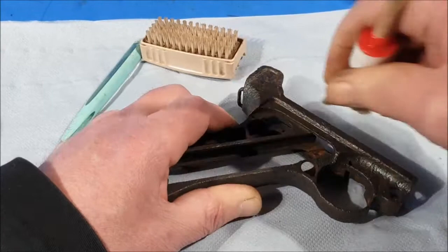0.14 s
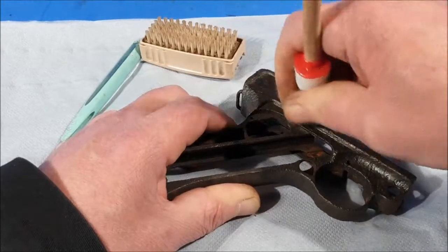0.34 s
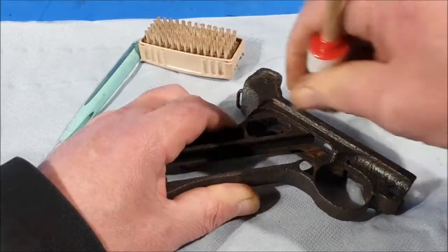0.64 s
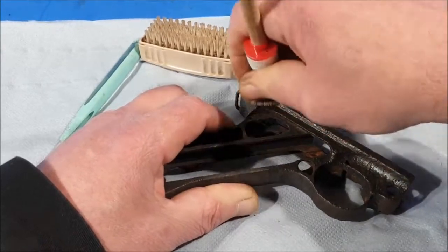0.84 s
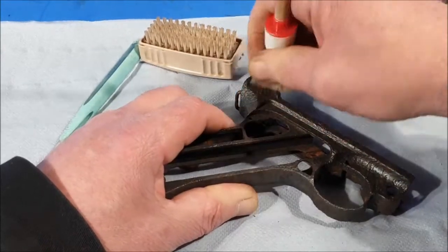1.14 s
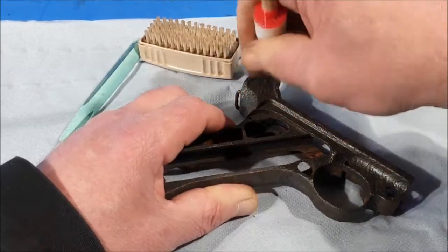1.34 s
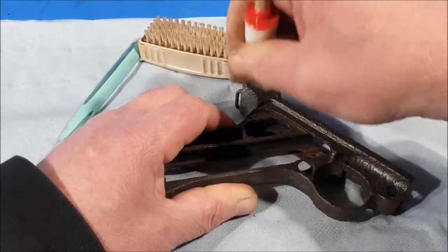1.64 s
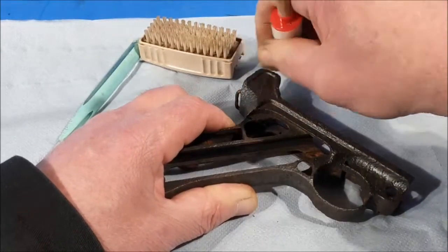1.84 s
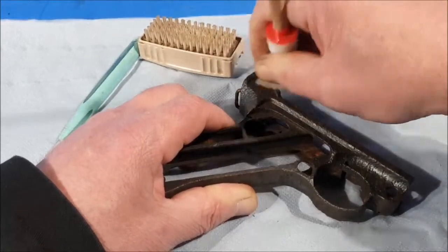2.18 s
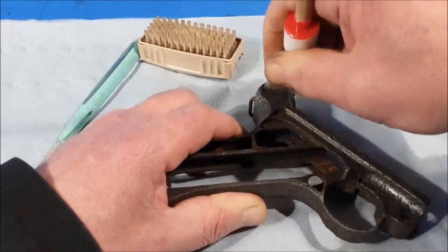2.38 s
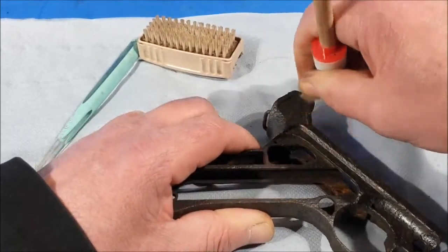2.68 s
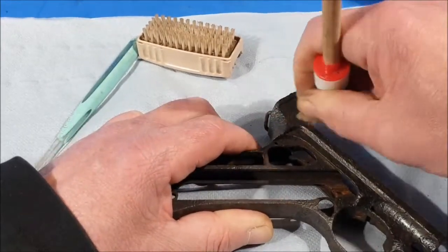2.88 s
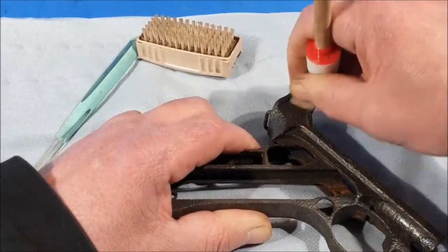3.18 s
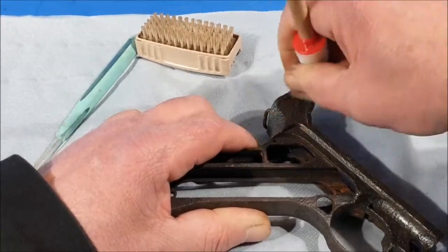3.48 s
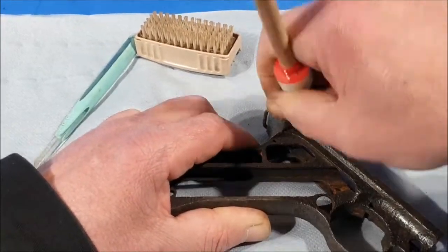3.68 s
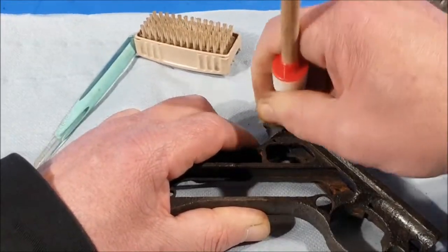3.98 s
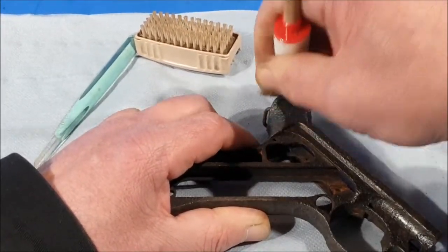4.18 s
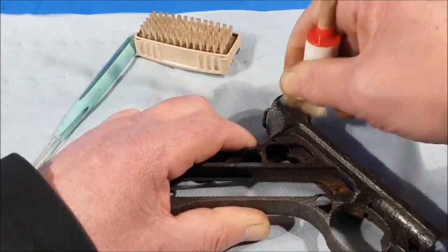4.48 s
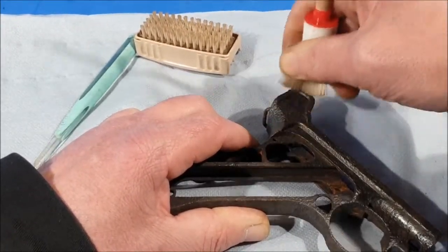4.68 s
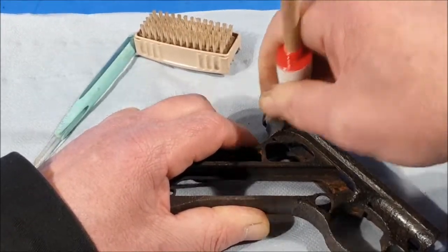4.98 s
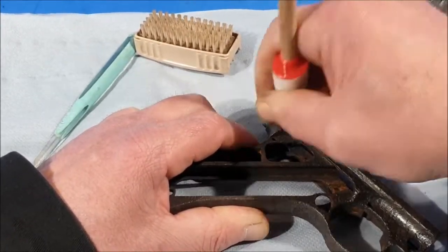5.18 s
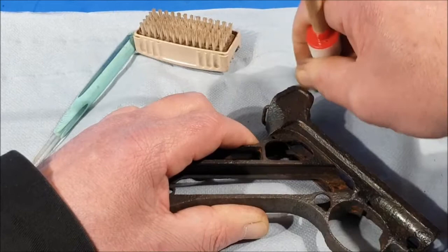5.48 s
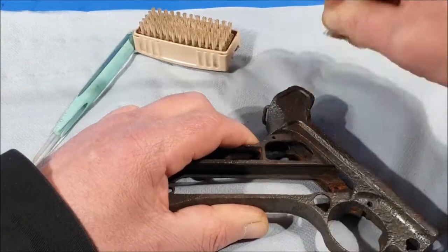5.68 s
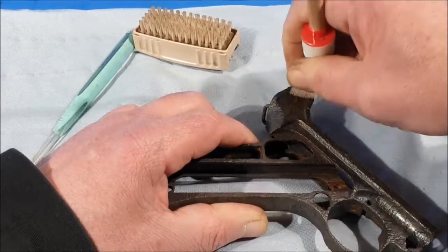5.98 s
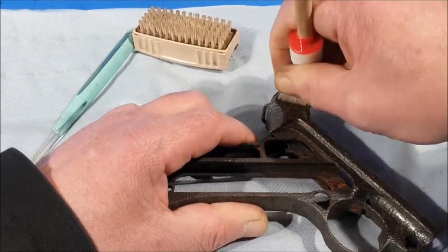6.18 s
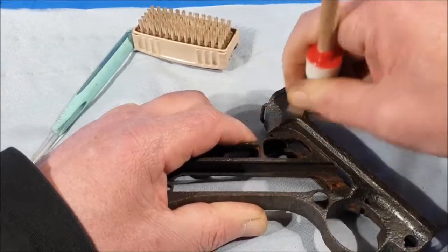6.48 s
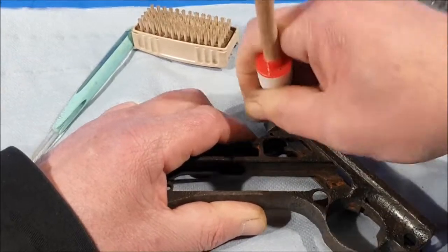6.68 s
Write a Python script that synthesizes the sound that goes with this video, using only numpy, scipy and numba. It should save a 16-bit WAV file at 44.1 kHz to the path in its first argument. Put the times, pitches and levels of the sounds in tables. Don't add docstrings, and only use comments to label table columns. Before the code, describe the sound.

A stiff brush scrapes a rusty steel frame in short, dry, gritty strokes, with dull bench thumps and faint metallic ticks in a quiet room.

```python
import sys
import numpy as np
from scipy import signal
from scipy.fft import rfft, irfft, next_fast_len
from scipy.io import wavfile
from scipy.ndimage import uniform_filter1d
from numba import njit

SR = 44100
rng = np.random.default_rng(int(sys.argv[2]) if len(sys.argv) > 2 else 0)


def put_to_file(sound):
    columns = np.atleast_2d(sound).T
    safe = np.clip(columns, -1, 1)
    whole_steps = np.round(safe * 32767)
    wavfile.write(sys.argv[1], SR, whole_steps.astype(np.int16))


def invert_db(x):
    u = np.asarray(x, float) / 20
    return 10 ** u


N = 301203

# (time [s], bench thump [dB], scuff of the tips [dB], push [ms], lowest bench modes [dB])
LANDINGS = [(0.296, -54, -52.5, 5.3, -2), (0.775, -27.5, -48, 2.2, 2), (1.151, -25.5, -46, 3.6, -1),
            (1.408, -21.5, -49, 3.8, -1.5), (1.704, -20, -45, 3.93, 1), (1.938, -19, -51.5, 5.7, -6),
            (2.175, -19.5, -46, 3, 0), (2.865, -34, -50, 5.8, 3), (3.158, -16, -42, 6.5, -2),
            (3.433, -21, -43, 4.5, 1.5), (3.712, -22.5, -42, 3.8, 0.5), (3.99, -27, -47.5, 4.9, 2.5),
            (4.24, -19, -42, 4.2, 0.5), (4.493, -25, -46, 6.5, -2.5), (4.752, -23, -42, 3.86, -2),
            (4.929, -29, -45.5, 14.5, -1), (5.891, -26.5, -42.5, 6.6, 0.5), (6.686, -22, -42, 5.1, 3.5)]
# (pitch [Hz], level [dB], time to fade by 60 dB [s])
LOW_RING = [
    (3730, -14, .05),
    (4730, -7, .04),
    (4813, 0, .105),
    (4870, -9, .045),
    (5819, -10, .05),
]
MID_RING = [
    (7540, -8, .03),
    (7634, -1, .06),
    (7700, -12, .03),
    (8570, -14, .04),
    (10400, -10, .05),
    (11240, -10, .06),
]
HIGH_RING = [
    (14040, -2, .04),
    (14610, -8, .04),
]


def level(x, db):
    return x * invert_db(db) / np.sqrt(np.mean(x ** 2))


def colour(x, points, scale=1):
    hz, db = np.transpose(points)
    size = next_fast_len(N)
    f = np.arange(1, size // 2 + 2) * SR / size
    gain = invert_db(scale * np.interp(np.log(f), np.log(hz), db))
    return irfft(rfft(x, size) * gain, size)[..., :N]


def band_pass(x, hz, kind):
    return signal.sosfilt(signal.butter(3, hz, kind, fs=SR, output="sos"), x)


def ring(x, modes):
    out = 0
    for hz, db, t60, *sign in modes:
        r = np.exp(-np.log(1000) / (abs(t60) * SR))
        w = 2 * np.pi * hz / SR
        tone = signal.lfilter([0, r * np.sin(w)], [1, -2 * r * np.cos(w), r * r], x)
        out = out + np.prod(sign) * invert_db(db) * tone
    return out


def blows(times, db, shape):
    out = np.zeros(N + 4096)
    for k, (s, gain) in enumerate(zip(times, invert_db(db))):
        piece = shape(k)
        out[int(s * SR):int(s * SR) + len(piece)] += gain * piece
    return out[:N]


def walk(rate):
    k = int(SR / rate)
    steps = np.repeat(rng.standard_normal(N // k + 1), k)
    return 1.33 * uniform_filter1d(steps, k)[:N]


def curve(rows):
    s, *columns = np.transpose(rows)
    return [np.interp(np.arange(N) / SR, s, c) for c in columns]


def contact(rows):
    rise_db_s, fall_db_s = 875, 1030
    s, length, first_db, last_db, tint_db = np.transpose(rows)[:, :, None]
    t = np.arange(N // 44 + 2) / 1000
    lean = np.clip((t - s) / np.maximum(length, .002), 0, 1)
    db = first_db + (last_db - first_db) * lean
    db = db - rise_db_s * np.maximum(s - t, 0) - fall_db_s * np.maximum(t - s - length, 0)
    gain = invert_db(np.maximum(db, -130))
    total = gain.sum(axis=0)
    return curve(np.c_[t, total, (gain * tint_db).sum(axis=0) / total])


@njit
def walls(x, lags, gain, damp):
    line, soft, out = np.zeros((8, 4096)), np.zeros(8), np.zeros((2, len(x)))
    for i in range(len(x)):
        total = 0.
        for k in range(8):
            soft[k] += (1 - damp) * (gain[k] * line[k, (i - lags[k]) & 4095] - soft[k])
            total += soft[k]
            out[k % 2, i] += soft[k]
        for k in range(8):
            line[k, i & 4095] = x[i] + soft[k] - total / 4
    return out


def room(x):
    t60_s, damp, tail_db = 0.27, 0.44, -14
    lags = rng.integers(400, 1900, 8)
    return invert_db(tail_db) * walls(x, lags, invert_db(-60 * lags / SR / t60_s), damp)


def air():
    # (pitch [Hz], level [dB per Hz])
    air_colour = [(18, -63), (30, 5.5), (107, 0.5), (340, -12.5), (814, -13), (1150, -33), (3660, -40),
                  (6720, -44), (8310, -41), (14800, -34), (16500, -62)]
    mid, side = rng.standard_normal((2, N))
    side = colour(side, [(40, 10.5), (100, -11.5), (500, -2.5), (1200, 5.0)])
    return level(colour(np.array([mid + side, mid - side]), air_colour), -57) * invert_db(walk(3.6))


def hollow():
    # (start [s], length [s], first level [dB], last level [dB])
    whispers = [(.2, 0.31, -87, -64), (2.55, 0.26, -79, -78), (3.0, .15, -80, -85), (3.29, .14, -76, -80),
                (3.58, .12, -74, -84), (3.84, 0.15, -89, -90), (4.27, 0.13, -70, -78),
                (4.86, 0.24, -78, -86), (5.67, .22, -70, -74), (5.92, 0.12, -71, -68),
                (6.24, 0.052, -71, -76), (6.58, .1, -74, -91)]
    # (pitch [Hz], level [dB], time to fade by 60 dB [s])
    cavity = [
        (2220, -2, .035),
        (2290, 0, .035),
        (2370, -7, .03),
    ]
    noise = ring(rng.standard_normal((2, N)), cavity)
    gain = contact(np.c_[whispers, np.zeros(len(whispers))])[0] * invert_db(1.2 * walk(25))
    return level(noise, 0) * uniform_filter1d(gain, size=700)


def sleeve():
    # (start [s], length [s], first level [dB], last level [dB])
    passes = [
        (0.0, 0.034, -59, -66),
        (.44, 0.054, -64, -62),
        (.5, 0.15, -60, -77),
        (1.8, 0.11, -66.5, -68.5),
        (4.76, 0.2, -57.5, -71),
        (2.32, 0.116, -63, -64),
        (2.46, 0.13, -58, -67),
        (4.95, 0.25, -63.5, -63.5),
    ]
    noise = colour(rng.standard_normal((2, N)), [(900, -2), (1250, -0.5), (1650, -1.0), (2200, -12.0)])
    gain = contact(np.c_[passes, np.zeros(len(passes))])[0]
    return level(noise, 0.38) * gain * invert_db(2.9 * walk(29.99))


def cloth():
    # (start [s], length [s], first level [dB], last level [dB], dull swish [dB])
    slides = [(0.047, 0.11, -61.5, -58, -12), (0.157, 0.21, -57, -73, -32), (0.625, 0.13, -96, -71, -10),
              (2.301, 0.19, -53, -81, -4), (2.4, 0.058, -70, -67, -20), (2.47, 0.14, -51.5, -52.5, -13.5),
              (2.751, 0.11, -59, -70, -6), (3.027, 0.18, -63, -76, -24), (3.317, 0.11, -61.5, -66.5, -20),
              (3.59, 0.15, -59, -76, -5.5), (5.669, 0.084, -51, -63.5, -8), (5.765, 0.16, -61, -55, -10.5),
              (5.953, 0.17, -54.5, -64, -12)]
    gain, dull_db = contact(slides)
    rustle = colour(rng.standard_normal((2, N)), [(1200, -11), (1900, -14), (2150, -2.5), (3000, -6.5),
                                                  (4000, -3.0), (6000, -5.5), (11000, -1.0), (16000, -7.0)])
    swish = colour(rng.standard_normal((2, N)), [(700, -1.0), (1200, 0.0), (1700, -43), (3500, -7), (8000, -36)])
    fabric = level(rustle, -2) + level(swish, -2) * invert_db(dull_db)
    return fabric * uniform_filter1d(gain * invert_db(1.5 * walk(40)), 500)


def bench(stroke_db):
    # (time [s], bench thump [dB], push [ms], lowest bench modes
    # [dB])
    bumps = [(0.33, -37, 5.2, -0.5), (2.474, -43.5, 1.7, 3.5), (2.56, -46, 5.3, 1), (1.745, -33, 3.4, -9),
             (1.5, -35, 5, 0), (6.01, -36, 4.1, 1), (5.135, -38, 1.7, 12.5), (5.327, -39.5, 6.2, 8.5),
             (5.512, -30, 9.6, 1.5), (5.626, -27.5, 4.8, -16), (5.634, -35.5, 3.5, 9.5),
             (5.3, -27.5, 5.3, -8), (6.382, -24, 7.4, -3.5), (6.795, -44, 2.7, -16)]
    # (time [s], level [dB])
    press = [(0.0, -55), (0.61, -69), (1.23, -57.5), (1.33, -55.5), (2.17, -57.5), (2.32, -49.5),
             (2.63, -65), (3.58, -52), (3.67, -48.5), (4.34, -62), (4.43, -56), (4.55, -60.5),
             (5.55, -56.5), (5.73, -52), (5.93, -49.5), (6.09, -58.5), (6.72, -59.5), (6.83, -55.5)]
    # (time [s], upper bench modes [dB])
    bearing = [(.3, 0), (.78, -0.5), (1.15, 1), (1.41, -0.5), (1.7, 5.5), (1.94, -2), (2.18, 0.5),
               (2.87, 1), (3.16, 1.5), (3.43, 3), (3.71, 0.5), (3.99, -3), (4.24, 0.5), (4.49, 2),
               (4.75, 0.5), (5.3, -1), (5.89, 3), (6.69, -0.5)]
    # (pitch [Hz], level [dB], time to fade by 60 dB [s], signed weight)
    bench_modes = [
        (49.6, -2.5, 0.61, 0.44),
        (87.4, 8, 0.069, 1),
        (134.9, -3, 0.39, 0.65),
        (171, -1.5, 0.17, -0.69),
        (217.5, -7.5, 0.41, -0.81),
        (275, -6.5, 0.053, -1.67),
        (397, -18.5, 0.22, 1),
        (309.5, -17.5, 0.15, 0.73),
    ]
    landings = np.array(LANDINGS)[:, [0, 1, 3, 4]]
    s, thump_db, push_ms, deep_db = np.vstack([landings, bumps]).T
    width = np.clip(push_ms * SR / 1000, 40, 900).astype(int)
    spot_db = 1.1 * rng.standard_normal((len(bench_modes), len(s)))
    upper_db = np.interp(s, *np.transpose(bearing))

    def push(k):
        return np.r_[-.3 * np.hanning(130) / 65, np.hanning(width[k]) / width[k] * 2]

    thumps = 0
    for db, mode in zip(spot_db, bench_modes):
        blow_db = thump_db - 7.5 + db + deep_db * (mode[0] < 110) + upper_db * (mode[0] > 190)
        thumps = thumps + ring(blows(s, blow_db, push), [mode])
    thumps = thumps * invert_db(1.1 * walk(30))
    shake = uniform_filter1d(rng.standard_normal((2, N)), 60) * invert_db(3 * walk(25))
    shake_db = curve(press)[0] + 4 + 0.41 * np.maximum(stroke_db + 61.5, -25)
    shake = ring(shake * invert_db(shake_db) / shake.std(), bench_modes) * invert_db(-47.5)
    uneven = 0.22 * shake[1] + 0.23 * uniform_filter1d(shake[1], size=400)
    return thumps + shake[0] + uneven * np.array([[1], [-1]])


def struck(s, db, modes):
    n = np.arange(int(.004 * SR))
    out = 0
    for mode in modes:
        swell = np.hanning(len(n)) * np.cos(2 * np.pi * mode[0] * n / SR) * 4 / len(n)
        out = out + ring(blows(s, db, lambda k: swell), [mode])
    return out


def clinks():
    # (time [s], blow [dB], low ring [dB], middle ring [dB], high ring [dB])
    touches = [(3.272, -55, -54, -65, -62), (4.535, -55, -46, -58, -60), (1.245, -60, -47, -50, -60),
               (2.262, -57, -53, -58, -60), (5.52, -57, -41, -60, -58), (1.188, -70, -47, -43, -58),
               (1.153, -56, -56, -47.5, -60), (1.284, -45, -50, -52, -38), (1.408, -43, -57, -45, -62),
               (1.435, -50, -67, -52, -62), (2.72, -53, -50, -56, -58), (3.714, -50, -54, -49, -60),
               (5.583, -43, -44, -52, -46), (4.241, -16.5, -54, -55, -63), (5.893, -25, -53, -52, -55),
               (6.394, -40, -38, -57, -55), (6.49, -47, -43, -53, -55), (6.688, -45, -51, -61, -57),
               (1.505, -31, -62, -40, -44), (3.163, -36, -49, -50, -62), (3.546, -45, -47, -48, -55),
               (6.01, -36, -53, -63, -52), (6.57, -47, -51, -58, -59), (1.6091, -34, -66, -46, -52),
               (1.785, -30, -60, -43.5, -52), (2.034, -21, -70, -43, -54), (2.96, -36, -41.5, -61, -52),
               (3.25, -32, -45, -37, -52), (3.497, -30, -45, -58, -50), (3.7774, -30, -37, -57, -51),
               (3.8063, -26, -53, -62, -45), (3.864, -45, -71, -56, -67), (3.872, -52, -55, -75, -54),
               (4.4967, -60, -46, -45, -59), (4.7545, -10, -36.5, -35, -54), (4.9319, -22, -54, -43, -58),
               (5.6272, -6, -36.5, -28, -27), (5.6402, -3, -45, -34, -34), (6.3794, -40, -50, -47, -53),
               (6.455, -43, -35, -41, -32)]
    # (pitch [Hz], level [dB], time to fade by 60 dB [s])
    handle = [
        (365, -12, 0.19),
        (507, 9, 0.0096),
        (765, 10.5, 0.0045),
        (1050, 0, 0.022),
    ]
    s, crack_db, *rings_db = np.transpose(touches)
    noise = rng.standard_normal((len(s), 200)) * np.exp(-np.arange(200) / SR / 0.0004)
    crack = blows(s, crack_db - 23, lambda k: noise[k])
    knock = ring(blows(s, crack_db - 38, lambda k: np.ones(1)), handle)
    grip = invert_db(1.2 * walk(70))
    steel = sum(struck(s, db + 0.5, modes) for db, modes in zip(rings_db, (LOW_RING, MID_RING, HIGH_RING)))
    return crack + knock + grip * steel


def flecks(db):
    t60_s, snaps_per_s = 0.0073, 130
    out = 0
    for hz in np.geomspace(2280, 9360, num=12):
        snaps = (rng.random((2, N)) < snaps_per_s / SR) * rng.standard_normal(N)
        out = out + level(ring(snaps, [(hz, 0, t60_s)]), -11 - 6 * (hz < 3600))
    return out * invert_db(db - 12)


def ticks():
    # (time [s], peak [dB], centre [Hz], width [octaves])
    flicks = [(0.323, -36, 6950, 2.9), (.575, -39, 7000, 2), (0.706, -41, 6000, 1.3), (.73, -41, 6500, 1),
              (.771, -31.5, 8050, 2.2), (1.887, -49, 7000, 2.2), (2.473, -46, 4000, 1.5),
              (2.902, -31, 6000, 3), (3.609, -46, 2470, 1.5), (3.967, -51, 2500, 1.2),
              (4.014, -39, 12000, 1.2), (4.026, -45, 8000, 2.2), (4.188, -48, 2500, 1.8),
              (4.4806, -26, 11500, 0.79), (4.687, -34, 12000, 1.1), (4.709, -34, 1100, 0.91),
              (5.5838, -32, 5000, 1.1), (5.5943, -29, 3000, 3.6), (5.6265, -11, 7000, 2.3),
              (5.6287, -10, 9000, 2.2), (5.6395, -17.5, 6000, 4.1), (5.5965, -17, 800, 1.5),
              (1.604, -35, 8000, 2), (1.614, -38, 7000, 3), (5.9523, -32, 9000, 2),
              (6.7057, -18, 7050, 2.42), (6.7275, -32, 7000, 2.5), (6.796, -17, 13100, .7)]
    strikes = [(s, scuff_db - 5, 6500, 2.6) for s, _, scuff_db, _, _ in LANDINGS]
    s, tick_db, hz, octaves = np.vstack([strikes, flicks]).T
    crackle_s = np.where(np.arange(len(s)) < len(strikes), .0022, .001)
    fade = np.exp(-np.arange(900) / SR / crackle_s[:, None, None])
    noise = rng.standard_normal((len(s), 2, 900)) * fade
    edges = hz[:, None] * 2 ** (np.maximum(octaves, .2)[:, None] * [-.5, .5])
    edges = np.minimum(edges, [16000, 20000])
    noise = [band_pass(n, e, "band") for e, n in zip(edges, noise)]
    return np.array([blows(s + 0.00076, tick_db - 9.0, lambda k: noise[k][side]) for side in range(2)])


def stroke():
    # (start [s], length [s], first level [dB], last level [dB], fine hiss [dB])
    drags = [(0.0, 0.027, -47, -66, -6.5), (.355, 0.031, -57, -51, -4), (0.4, 0.074, -47.5, -40.5, -3),
             (0.487, 0.091, -44.5, -58, -1.5), (0.8, 0.071, -68, -52, -4),
             (0.885, 0.07, -48.5, -35.5, -4.5), (1.183, 0.097, -53, -38.5, -6),
             (1.452, 0.053, -45, -32.5, -5), (1.6, 0.008, -84, -51, 7), (1.738, 0.039, -45, -30.5, -6.5),
             (1.968, 0.042, -56, -39, -2), (2.012, 0.015, -42, -31, -4), (2.2, 0.01, -51.5, -41, -2),
             (2.228, 0.043, -37.5, -44.5, -4.5), (2.629, 0.091, -49, -43.5, -2),
             (2.919, 0.048, -40, -40, -3), (3.183, 0.069, -47.5, -33, -5.5),
             (3.471, 0.074, -45, -40.5, -0.5), (3.735, 0.065, -52, -32.5, -3.5),
             (3.872, 0.032, -62, -76, -8), (4.0, 0.043, -66, -57, -4), (4.06, 0.052, -52.5, -46.5, 0),
             (4.304, 0.08, -46, -42.5, -5), (4.531, 0.12, -40.5, -47.5, -4),
             (4.791, 0.04, -35.5, -52, -5.5), (4.834, 0.058, -48.5, -54, -8),
             (6.707, 0.058, -57, -60, -2.5), (6.793, 0.039, -50.5, -38.5, -3)]
    # (start [s], length [s], first level [dB], last level [dB], fine hiss [dB])
    scrubs = [(4.942, 0.022, -53, -60, -9), (5.382, 0.025, -65, -62, -1), (5.468, 0.023, -61, -66, -9),
              (5.002, 0.064, -47.5, -47.5, -1.5), (5.126, 0.041, -43.5, -38.5, -7),
              (5.215, 0.046, -39.5, -43.5, -6.5), (5.308, 0.029, -50.5, -39, -5.5),
              (5.404, 0.042, -43.5, -45.5, -4), (5.504, 0.053, -46.0, -40, 1),
              (5.597, 0.042, -39, -74, -13.5), (5.645, 0.024, -35.5, -59, -12),
              (5.901, 0.027, -67, -52.5, -9), (6.003, 0.019, -44.5, -42, -4),
              (6.082, 0.056, -39.5, -45.5, -3.5), (6.179, 0.053, -46, -43, -5.5),
              (6.259, 0.042, -56.5, -57, 2), (6.306, 0.028, -42.5, -44, -6.5),
              (6.385, 0.035, -43, -36.5, -4), (6.463, 0.034, -34.5, -39.5, -9),
              (6.534, 0.041, -50, -53.5, -2)]
    # (time [s], steel song [dB])
    edge = [(0, -23), (1.0, -3.5), (1.15, -13), (2.3, -14), (2.65, -30), (3.1, -16), (3.9, -17), (4.0, -13),
            (4.3, -6), (4.44, -20), (4.5, -3), (4.65, -6), (5.0, -8), (5.5, -8), (6.0, -13), (6.3, -22),
            (6.45, -15), (6.55, -17), (6.83, -11)]
    gain, fine_db = contact(np.vstack([drags, scrubs]))
    s, _, scuff_db, _, _ = np.transpose(LANDINGS)
    scuff = invert_db(-509 * np.arange(4096) / SR)
    db = 20 * np.log10(gain + blows(s + 0.0011, scuff_db, lambda k: scuff))
    song_db = -13 + curve(edge)[0] - 0.03 * (db + 64) + 3.5 * walk(14)
    return db, fine_db, song_db


def bristles(db, fine_db, song_db):
    # (pitch [Hz], level [dB per Hz])
    rust = [(290, -18), (500, -12.5), (614, -18), (885, -13.5), (1710, -21), (2130, -13), (2850, -17),
            (4690, -3), (8180, -6.5), (10000, 6), (14700, 11.5), (15800, 10.5), (16500, -44)]
    # (time [s], ridge buzz [dB], pitted fizz [dB], deep rasp [dB])
    surface = [(.42, 1, 2.5, -5.5), (.52, 0, 3.5, 1), (.86, 3, -1, 1.5), (.94, 1, 0.5, -1.5),
               (1.24, 3, 0, -1.5), (1.49, 3, 0.5, 1), (1.765, 3, -1.5, 1), (2.01, 4.5, -2.5, 2),
               (2.235, 3.5, -2.5, 1.5), (2.68, 3.5, 4.5, 2.5), (2.95, 2.5, 1, 2), (3.23, 0.5, 2, 0),
               (3.52, 5, 3.5, 5), (3.78, 0, -0.5, 1), (4.08, 1.5, 1, -2), (4.35, -1, 3, -1.5),
               (4.59, 2.5, 2, 0.5), (4.8, 0, -0.5, -2), (4.88, -14, -1, -7), (5.03, 2, 2, 4),
               (5.15, 4.5, 1.5, 1.5), (5.24, 1.5, -2, 3), (5.33, 0.5, 1.5, 0), (5.43, 6, 0.5, 4.5),
               (5.53, 0.5, 2.5, 4.5), (5.92, -1, 3.5, 0.5), (6.02, 3, 2, -11), (6.11, 4, 3, 6),
               (6.2, 4, 0, 3.5), (6.3, 0.5, 2, 1), (6.41, 0, 2, -1), (6.48, -3, -2, 3), (6.55, 5.5, 2, 7.5),
               (6.73, 0.5, 0, 7.5), (6.81, 2.5, 0, -1.5)]
    slips = rng.standard_normal((2, N)) * invert_db(2.0 * np.minimum(rng.exponential(size=(2, N)), 6))
    shared = 0.4
    slips[1] = shared * slips[0] + np.sqrt(1 - shared ** 2) * slips[1]
    slips = slips * invert_db(1.25 * walk(160) + 1.08 * walk(55))
    rasp = level(colour(slips, rust), 0)
    ridge_db, pit_db, deep_db = curve(surface)
    for band_hz, lift_db in (([4000, 5000], ridge_db), ([9830, 11140], pit_db)):
        buzz = signal.lfilter(*signal.butter(1, band_hz, "band", fs=SR), rasp)
        rasp = rasp + (invert_db(1.33 * lift_db) - 1) * buzz
    deep = band_pass(rasp, 3300, "low")
    middle = band_pass(rasp, [3300, 9000], "band")
    fine = band_pass(rasp, 9000, "high")
    deep = deep * invert_db(deep_db + 0.012 * (db - 9) + 0.95 * walk(60))
    lower = band_pass(middle, 6000, "low")
    patchy = lower * invert_db(0.76 * walk(30) - 0.75 * (fine_db + 3.5)) + (middle - lower) * invert_db(1.33 * walk(33))
    force = level(slips[0], 0) * invert_db(db)
    song_db, fine_db = np.minimum(song_db, -4), np.minimum(fine_db, 5)
    song = ring(force * invert_db(song_db - 24.5), LOW_RING)
    song = song + ring(force * invert_db(0.36 * song_db - 33.0), MID_RING + HIGH_RING)
    tuft = (deep + patchy) / patchy.std() + level(fine, 0) * invert_db(fine_db + walk(45))
    return tuft * invert_db(db) + song


def ports(x):
    # (pitch [Hz], left minus right [dB])
    shading = [(60, 1.5), (250, 3.5), (500, 5.5), (800, 9), (1200, 12.5), (2400, 14.5), (4200, 10),
               (6500, 16.5), (8200, 11), (10000, 0), (12000, 7), (16000, 11.5)]
    return np.array([colour(x[0], shading, .5), np.roll(colour(x[1], shading, -.5), 1)])


def scene():
    db, fine_db, song_db = stroke()
    brush = bristles(db, fine_db, song_db) + flecks(db) + ticks()
    brush = brush + cloth() + sleeve() + hollow()
    taps = clinks()
    tail = room(brush.mean(axis=0) + .5 * taps)
    return ports(brush + taps + bench(db) + tail + air())


def roll_off(x):
    return signal.sosfilt(signal.butter(12, 17010, fs=SR, output="sos"), x)


def record(dry):
    x = signal.sosfilt(signal.butter(4, 38, "high", fs=SR, output="sos"), dry)
    x = signal.sosfilt(signal.ellip(8, .3, 42, 15950, fs=SR, output="sos"), x)
    return roll_off(x)


dry = scene()
out = record(dry)
put_to_file(out)
```